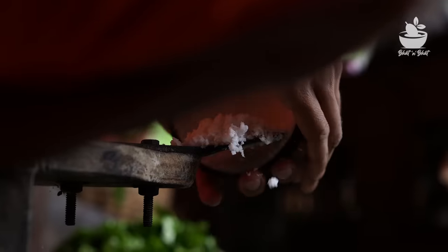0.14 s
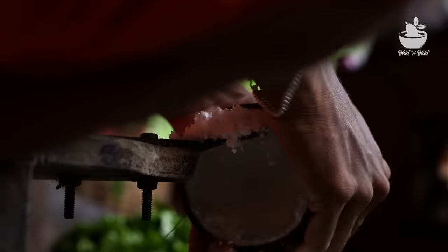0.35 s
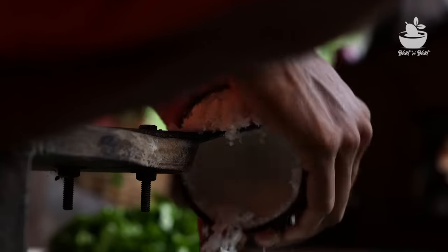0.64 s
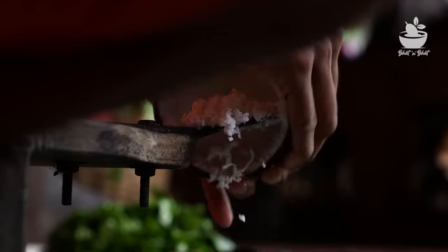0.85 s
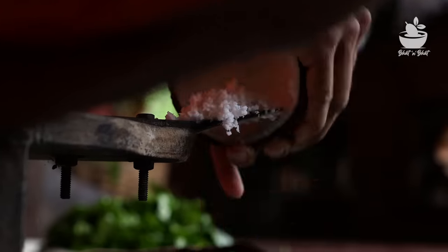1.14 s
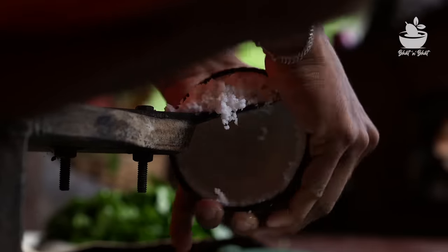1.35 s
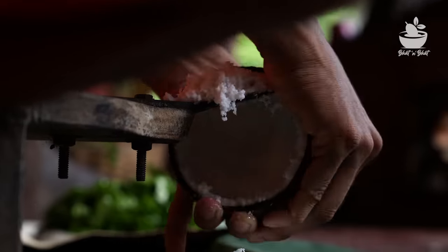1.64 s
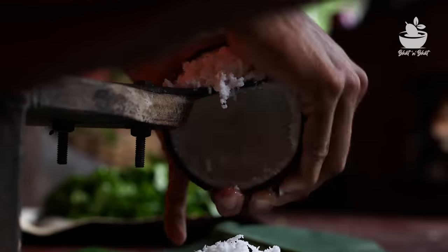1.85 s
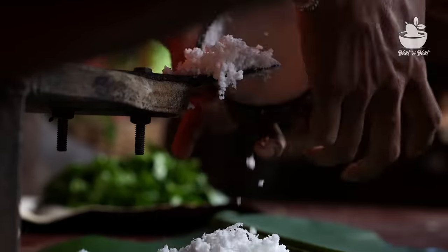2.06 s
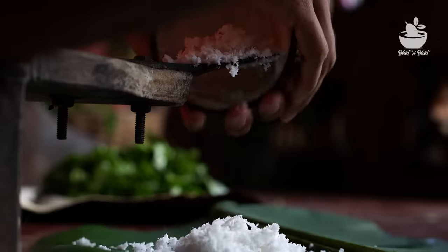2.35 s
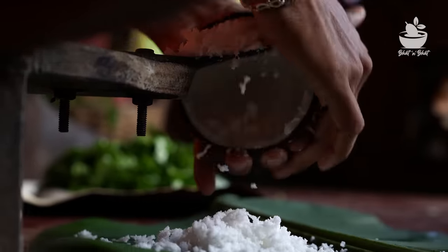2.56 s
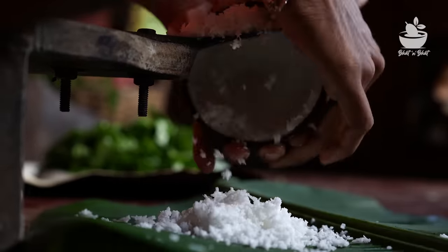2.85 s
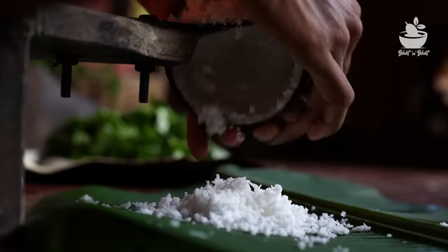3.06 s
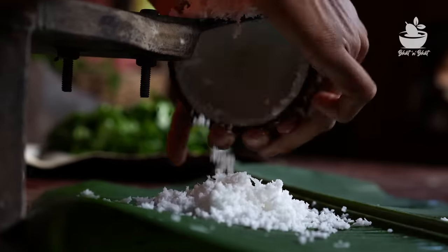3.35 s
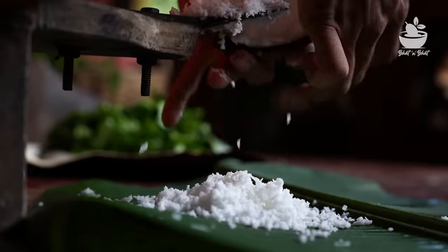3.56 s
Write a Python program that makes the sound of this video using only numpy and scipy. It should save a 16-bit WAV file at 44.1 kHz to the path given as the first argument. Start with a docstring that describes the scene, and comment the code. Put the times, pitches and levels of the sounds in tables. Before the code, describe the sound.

Coconut scraping, close and dry with a faint room tail over low, quiet room tone. Ten hollow, stuttering strokes of about 0.15 s start near 0.23, 0.56, 0.88, 1.2, 1.53, 1.82, 2.38, 2.72, 3.02 and 3.3 s, each biting hard then easing. Woody knocks precede them, loudest at 3.27. Deep catches thump, cracking sharply at 2.44; faint husk rubbing precedes it, and tiny wet crumbs tick.

```python
"""A small kitchen, heard close up: a coconut half is dragged over a serrated blade in ten strokes.
The teeth catch and slip in the flesh; these force pulses ring the resonances of shell and board.
Pulses and patchy noise rasp the blade, and coloured noise makes the fibres tear; some deep catches thump.
Between strokes the shell knocks back onto the blade, fingers rub the husk and crumbs tick on a leaf."""
import sys
import numpy as np
from scipy import signal
from scipy.fft import rfft, irfft, next_fast_len
from scipy.io import wavfile
from scipy.ndimage import uniform_filter1d, minimum_filter1d, map_coordinates

SR = 44100
rng = np.random.default_rng(int(sys.argv[2]) if len(sys.argv) > 2 else 0)


def persist_wave(psi):
    """Save psi, clipped to +-1, as 16-bit WAV."""
    counts = np.round(np.clip(psi, -1, 1) * 32767).astype(np.int16)
    wavfile.write(sys.argv[1], SR, np.atleast_2d(counts).T)


N = 163170
T = np.arange(N) / SR  # seconds

# Resonances of the shell and its hollow. Each row: nominal frequency in Hz, nominal width in Hz, level in dB.
SHELL_MODES = [(244.6, 32.3, -6.5), (368.3, 28.7, 0), (449, 64.8, -5), (488.8, 55.6, -4), (545.5, 46.5, -7),
               (628, 62, -12), (716.5, 108, -25.5)]
# Resonances of blade and shell wall. Each row: nominal frequency in Hz, width in Hz, level in dB.
BLADE_MODES = [(782, 290, -1), (1002, 92, 4), (1097, 68, 0), (1339, 126, -0.5), (1592, 63, -5),
               (2100, 315, -8.5), (2428, 228, -8.5), (2967, 61, -10.5), (3280, 192, -16.5),
               (4246, 232, -20.5), (4610, 120, -22.5), (5520, 950, -26)]
# Resonances of the wooden board. Each row: nominal frequency in Hz, nominal width in Hz, level in dB.
BOARD_MODES = [(200, 41, -7), (240.4, 30.3, 3.5), (290, 64, -7)]
# Spectrum of tearing, wet flesh. Each row: frequency in Hz, relative level in dB.
TEAR_COLOUR = [(800, -25), (2500, 5), (4500, 7), (5800, 2), (7000, 0.5), (8300, -.5), (9200, 0.3),
               (10200, 0), (10800, -6), (12300, -5), (14000, -9.5), (15600, -3.5)]


def amp(db):
    """Decibels to gain."""
    return 10 ** (np.asarray(db) / 20)


def unit(x):
    """Scale to rms 1."""
    return x / np.sqrt(np.mean(x ** 2) + 1e-20)


def peaked(x, db):
    """Scale so that the peak lies at db."""
    return amp(db) * x / np.abs(x).max()


def along(points, hz):
    """Read a curve of (Hz, value) points on a log frequency axis."""
    f, v = np.transpose(points)
    return np.interp(np.log(hz + 1), np.log(f + 1), v)


def filtered(x, response):
    """Multiply the spectrum of x by a function of frequency."""
    n = x.shape[-1]
    padded = next_fast_len(n + SR // 4)  # room for the ringing
    spectrum = rfft(x, padded) * response(np.fft.rfftfreq(padded, 1 / SR))
    return irfft(spectrum, padded)[..., :n]


def coloured(x, points):
    """Give x a smooth spectral colour, at rms 1."""
    return unit(filtered(x, lambda hz: amp(along(points, hz))))


def rung(x, modes, pitch=1, damping=1, spread=0):
    """Drive a body's resonances with x, at rms 1; damping widens them, spread detunes each at random."""
    tuned = [(hz * pitch * (1 + spread * rng.standard_normal()), width * damping, db)
             for hz, width, db in modes]

    def response(f):
        total = 0
        for k, (hz, width, db) in enumerate(tuned):
            resonance = 1j * f * width / (hz * hz - f * f + 1j * f * width)
            total = total + (-1) ** k * amp(db) * resonance  # neighbours in opposite polarity
        return total

    return unit(filtered(x, response))


def softened(x, contact_hz):
    """A force rounded off by the soft flesh: two equal low-passes in a row."""
    return filtered(x, lambda f: 1 / (1 + 1j * f / contact_hz) ** 2)


def add(track, s, sound):
    """Mix a sound into the track at s seconds."""
    part = track[round(s * SR):][:len(sound)]
    part += sound[:len(part)]


def room_tone():
    """The kitchen's steady background: noise with a falling spectrum."""
    # Each row: frequency in Hz, relative level in dB per Hz.
    floor_colour = [(20, -4.5), (28, -3.5), (40, -9.5), (60, -8.5), (85, -9), (110, -3.5), (160, -15),
                    (360, -9), (700, -21.5), (1600, -32.5), (2400, -36.5), (3000, -39.5), (4600, -41.5),
                    (8000, -47), (9700, -48), (12000, -51), (15500, -52.5)]
    return amp(-42.5) * coloured(rng.standard_normal(N), floor_colour)


def crumbs():
    """Wet shreds land on the leaf: each tick is a short noise splat, part ringing and part coloured."""
    # The landings. Each row: time in seconds, peak level in dB, ringing frequency in Hz.
    ticks = [(1.092, -48, 6050), (1.160, -54, 7960), (2.608, -46, 6340), (3.168, -44, 5000),
             (3.545, -40, 4860), (3.644, -45, 2500)]
    # Colour of the splat. Each row: frequency in Hz, relative level in dB.
    splat_colour = [(300, -20), (1000, -8), (2500, -1.5), (5000, -10), (9000, -17.5), (15000, -23)]
    out, t = np.zeros(N), T[:SR // 20]
    for s, db, hz in ticks:
        splat = np.exp(-t / .003) * rng.standard_normal(len(t))
        tick = rung(splat, [(hz, 300, 0)]) + coloured(splat, splat_colour)
        add(out, s, peaked(tick, db))
    return out


def grains(size, per_s, spread_db):
    """Random tiny snaps of unequal strength and either sign, at rms 1."""
    hits = rng.random(size) < per_s / SR
    signs = np.sign(rng.standard_normal(size))
    strengths = amp(spread_db * np.clip(rng.standard_normal(size), -2, 2))
    return unit(hits * signs * strengths)


def regrip():
    """Fingers rub faintly over the husk as the hand shifts its grip: dense snaps through resonances."""
    # Swell and fade of the rub. Each row: time in seconds, level in dB.
    rustle = [(2.12, -83), (2.155, -62.5), (2.21, -68.5), (2.29, -69), (2.34, -62), (2.38, -56),
              (2.42, -72)]
    # Resonances of the rubbed husk. Each row: frequency in Hz, width in Hz, level in dB.
    rub_modes = [(2450, 130, 6.5), (4450, 400, -4.5), (5400, 400, -5), (3260, 900, -12)]
    s, db = np.transpose(rustle)
    level = amp(np.interp(T, s, db, left=-120, right=-120))
    return level * rung(grains(N, per_s=3700, spread_db=5.5), rub_modes)


def kitchen(x):
    """The room's tail, 10 ms late: noise in which each frequency dies at its own speed."""
    # Decay of the room. Each row: frequency in Hz, time to fall by 60 dB in seconds.
    decay = [(120, 0.99), (370, 0.39), (1000, 0.38), (3000, 0.47), (10000, 0.1)]
    hz, t, z = signal.stft(rng.standard_normal(SR), SR, nperseg=256)
    fade = amp(-60 * t / along(decay, hz)[:, None])
    tail = signal.istft(z * fade, SR, nperseg=256)[1]
    return signal.fftconvolve(x, np.pad(tail / np.linalg.norm(tail), (SR // 100, 0)))


def knock(shell_db, thud_db, click_db, ting_db):
    """The shell lands on the blade: an impulse and brief chatter ring every body, with a wet snap."""
    # Ting of the blade's teeth. Each row: frequency in Hz, width in Hz, level in dB.
    ting_modes = [(5000, 190, 3), (5320, 170, 4), (9500, 2600, -14.5)]
    chatter_db, chatter_s = -11, 0.0072  # start level against the impulse, decay as the teeth settle
    wet_snap_db, wet_snap_s = -17.5, 0.0046  # level against the click, decay
    t = T[:SR // 8]
    impulse = t == 0
    chatter = amp(chatter_db) * np.exp(-t / chatter_s) * rng.standard_normal(len(t))
    soft = softened(.1 * chatter + impulse, contact_hz=2500)
    sharp = chatter + impulse
    wet = coloured(np.exp(-t / wet_snap_s) * rng.standard_normal(len(t)), TEAR_COLOUR)
    shell = peaked(rung(soft, SHELL_MODES, damping=2.26), shell_db)  # damped by the blade's pressure
    thud = peaked(rung(soft, BOARD_MODES, pitch=1.135, damping=1.8), thud_db)
    click = peaked(rung(sharp, BLADE_MODES), click_db)
    ting = peaked(rung(sharp, ting_modes), ting_db)
    return shell + thud + click + ting + peaked(wet, click_db + wet_snap_db)


def jam(thump_db, crack_db):
    """A deep catch lets go: a softened impulse thumps the board and a noise burst cracks on the blade."""
    # The board flexing under a jam. Each row: frequency in Hz, width in Hz, level in dB.
    thump_modes = [(140, 59, -27.5), (250, 30, 6.5)]
    t = T[:SR // 8]
    crack = np.exp(-t / 0.0026) * rng.standard_normal(len(t))
    jolt = softened(1.0 * (t == 0), contact_hz=517)
    return peaked(rung(jolt, thump_modes), thump_db) + peaked(rung(crack, BLADE_MODES), crack_db)


def slips(size):
    """Teeth catch and let go: equal pulses at uneven, log-normal intervals."""
    slips_per_s, scatter = 270, .45  # rate at the median interval, spread of the log interval
    intervals = np.exp(scatter * rng.standard_normal(400)) * SR / slips_per_s
    at = np.cumsum(intervals).astype(int)
    return np.bincount(at, minlength=size)[:size]


def lumps(size):
    """Smooth random change in the toughness of the flesh along a stroke."""
    lumps_per_s = 130
    return map_coordinates(rng.standard_normal(100), [np.arange(size) * lumps_per_s / SR], mode="mirror")


def patchy(x, depth_db):
    """Bundles of fibres tear unevenly: small patches of time and frequency rise and dip, at rms 1."""
    patch_s, patch_hz = 0.0073, 1400  # life and breadth of one bundle
    z = signal.stft(x, nperseg=128)[2]
    bins, frames = round(patch_hz * 128 / SR), round(patch_s * SR / 64)
    field = uniform_filter1d(rng.standard_normal(z.shape), bins, 0)
    field = uniform_filter1d(field, frames, 1)
    return unit(signal.istft(z * amp(depth_db * unit(field)), nperseg=128)[1][:len(x)])


def stroke(start, length, attack, bite, release, sag_db, shell_db, board_db, rasp_db, tear_db, pitch):
    """One pull: the teeth bite hard, the push eases and the shell rings more freely, then lifts off."""
    snap_s, snap_share = 0.00077, 0.17  # burst of fibres after each slip, its share of the fibre noise power
    slip_click = 0.45  # direct click of the slips on the blade, relative to the fibres
    grip_spread = 0.013  # the grip shifts each board and blade mode from stroke to stroke
    hollow_hz, free_tilt_db = 377, 4.5  # the hollow's note, loss per octave away from it
    board_sag_db, rasp_sag_share, rasp_swell_db, tear_sag_db = 21.5, 0.37, 1, 6.5

    t = T[:SR // 4]
    size = len(t)
    push = np.minimum(t / attack, 1) * np.exp(-np.maximum(t - length, 0) / release)
    eased = np.clip((t - bite) / (length - bite), 0, 1)
    travel = np.minimum(t / length, 1)

    toughness = amp(1.5 * lumps(size))
    catches = slips(size) * toughness
    force = softened(catches, contact_hz=2270)
    bursts = unit(signal.fftconvolve(catches, np.exp(-t / snap_s))[:size])
    fibre_level = np.sqrt(1 - snap_share + snap_share * bursts ** 2)
    rasp_fibres, tear_fibres = fibre_level * rng.standard_normal((2, size))

    # Late in the stroke the hollow's note stands out.
    free_modes = [(hz, width, db - free_tilt_db * abs(np.log2(hz / hollow_hz)))
                  for hz, width, db in SHELL_MODES]
    pressed = rung(force, SHELL_MODES, pitch, damping=1.026)
    free = rung(force, free_modes, pitch, damping=.8)
    ring = (1 - travel) * pressed + travel * free
    shell = ring * amp(shell_db - sag_db * eased)

    board_sag = board_sag_db * np.clip(2 * t / length - .6, 0, 1)
    board = rung(force, BOARD_MODES, spread=grip_spread) * amp(board_db - board_sag)

    drive = unit(catches - catches.mean()) * slip_click + patchy(rasp_fibres, depth_db=3)
    swell = rasp_swell_db * (np.sin(np.pi * travel) + 0.25)  # most at mid-stroke, where the hand is fastest
    rasp_level = amp(rasp_db - rasp_sag_share * sag_db * eased + swell)
    rasp = rung(drive, BLADE_MODES, spread=grip_spread) * rasp_level

    torn = patchy(tear_fibres, depth_db=3) * np.sqrt(toughness)
    tear = coloured(torn, TEAR_COLOUR) * amp(tear_db + tear_sag_db * (1 - travel))  # fades to tear_db
    return push * (shell + board + rasp + tear)


def scene():
    """Knocks, jams and strokes with their room sound, over crumbs, rubbing and room tone; all centred."""
    # The shell set back on the blade. Each row: time in seconds, then peak levels in dB of
    # the shell's knock, low thud, click and blade ting.
    knocks = [(.124, -18.5, -22.5, -41, -60), (.525, -19, -34, -36, -44.5), (0.861, -18, -25.5, -40, -56),
              (1.180, -16, -20, -35, -50), (1.504, -19, -43, -41.5, -51), (1.795, -16, -21, -36.5, -47),
              (2.1036, -12, -21.5, -30, -55.5), (2.687, -18.5, -43, -32.5, -45.5),
              (3.002, -20.5, -27, -45, -54.5), (3.2661, -8, -38, -26, -38.5)]
    # The teeth jam deep and break free. Each row: time in seconds, peak levels in dB of thump and crack.
    jams = [(0.279, -8, -36), (.914, -14, -21.5), (1.238, -17.5, -35), (1.556, -12.5, -52),
            (2.42, -13, -30), (2.438, -11.5, -15.5), (2.787, -17, -37), (3.059, -14.5, -17)]
    # The pulls. Each row: start, length, attack, hard bite and release in seconds, the shell's sag after
    # the bite in dB, levels in dB of shell, board, rasp and tearing (at its end), shell pitch as a ratio.
    strokes = [ (0.225, 0.16, 0.015, 0.093, 0.0077, 3.5, -14.5, -23, -34, -55.5, 1.004),
               (0.555, .161, 0.023, 0.12, 0.013, 8.5, -12.5, -19, -33, -55, 1.028),
               (0.879, 0.15, 0.019, 0.069, 0.012, 8.5, -12.8, -30, -33.5, -55.5, 0.96),
               (1.205, .149, .026, 0.065, 0.01, 6.5, -12, -23, -32, -54, 0.98),
               (1.527, 0.13, 0.024, 0.061, .0115, 9.5, -13.2, -23, -31.5, -53.5, 1),
               (1.819, 0.12, 0.027, 0.075, 0.017, 8, -13, -29, -32.5, -50.5, 1.02),
               (2.376, 0.16, 0.034, 0.053, 0.017, 9, -13.5, -17.5, -32.5, -54, 0.989),
               (2.718, 0.13, 0.028, 0.088, 0.018, 8.5, -14, -23, -31.5, -52.5, 0.997),
               (3.018, 0.12, 0.023, 0.079, .0145, 11.5, -14.5, -26, -34.5, -52.5, 0.97),
               (3.302, 0.11, 0.013, 0.052, 0.02, 9, -12.5, -28.5, -30, -50, 1)]
    out = room_tone() + crumbs() + regrip()
    sounds = [(s, knock(*levels)) for s, *levels in knocks]
    sounds += [(s, jam(*levels)) for s, *levels in jams]
    sounds += [(row[0], stroke(*row)) for row in strokes]
    for s, sound in sounds:
        add(out, s, sound)
        add(out, s, amp(-17) * kitchen(sound))
    return np.array([out, out])


def record(dry):
    """A fast limiter turns the peaks down, then everything above the band limit is removed."""
    ceiling, hold_s, top_hz = 0.57, 0.002, 15800  # amplitude, seconds, Hz
    size = int(hold_s * SR)
    need = np.minimum(1, ceiling / (np.abs(dry).max(0) + 1e-9))
    gain = uniform_filter1d(minimum_filter1d(need, size), size)
    return filtered(dry * gain, lambda hz: hz < top_hz)


dry = scene()
out = record(dry)
persist_wave(out)
```